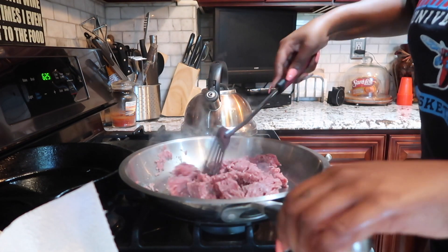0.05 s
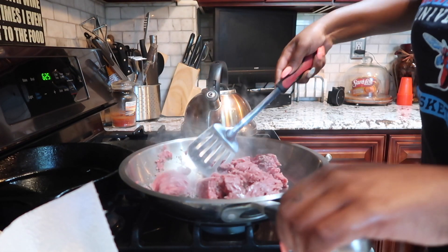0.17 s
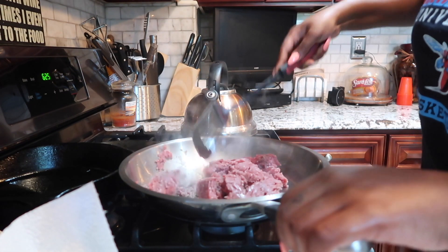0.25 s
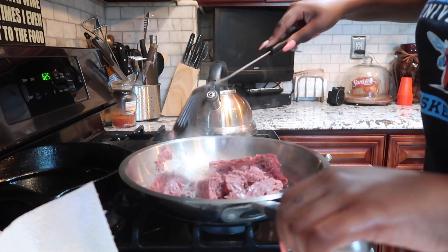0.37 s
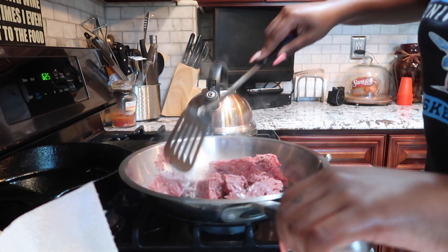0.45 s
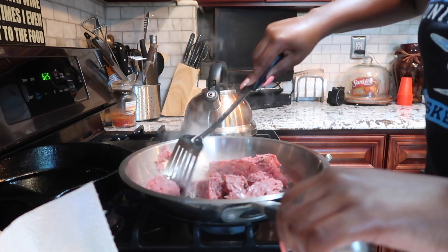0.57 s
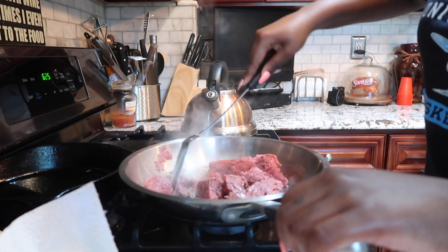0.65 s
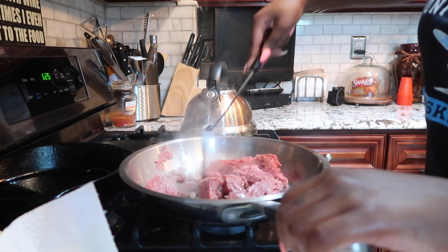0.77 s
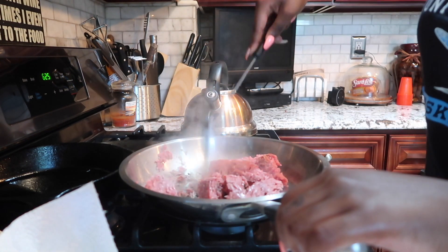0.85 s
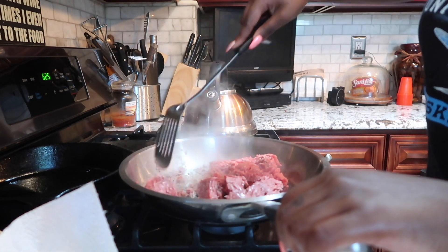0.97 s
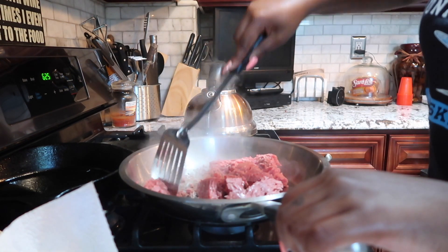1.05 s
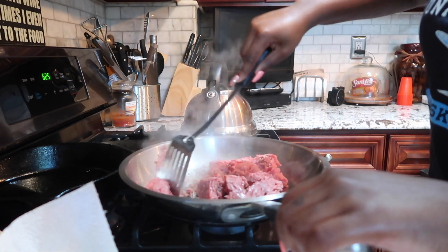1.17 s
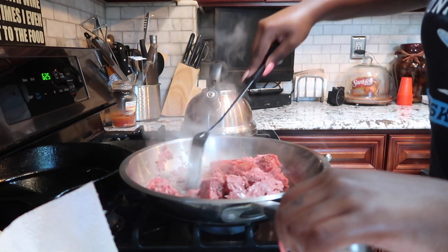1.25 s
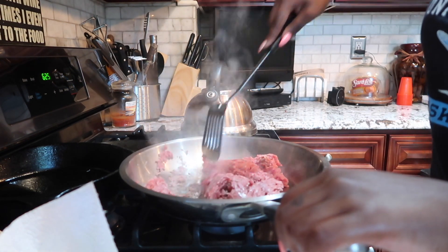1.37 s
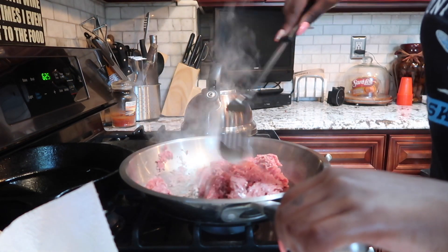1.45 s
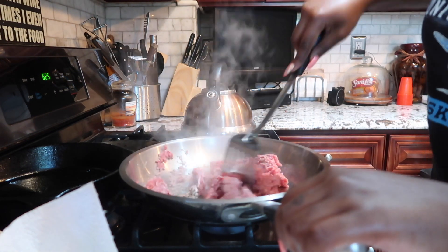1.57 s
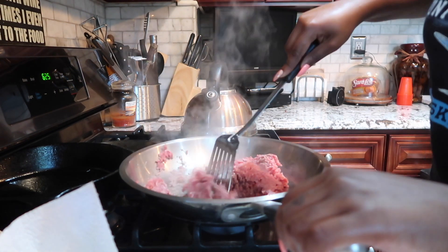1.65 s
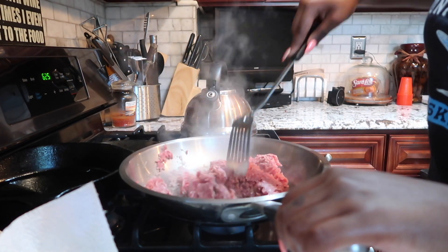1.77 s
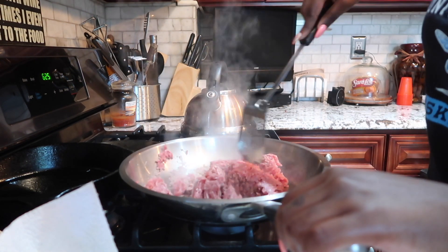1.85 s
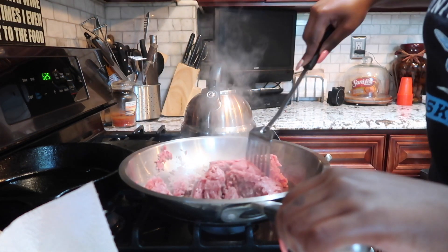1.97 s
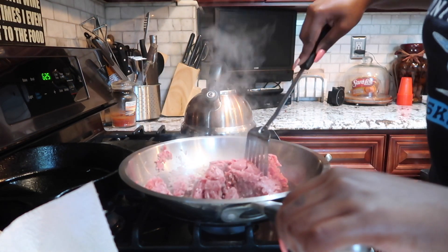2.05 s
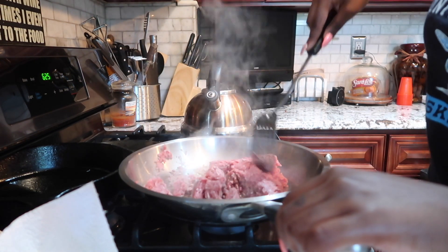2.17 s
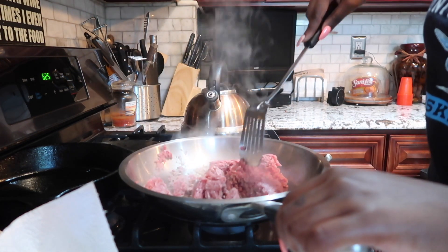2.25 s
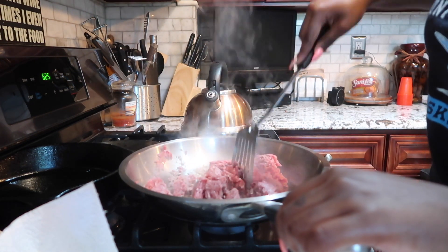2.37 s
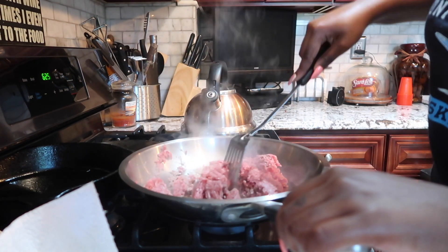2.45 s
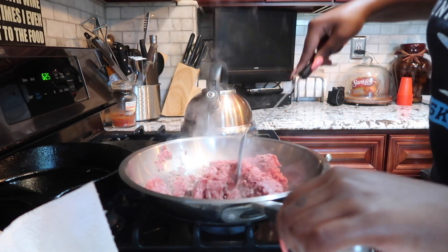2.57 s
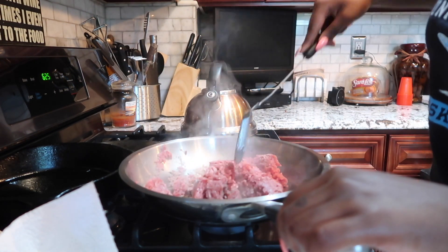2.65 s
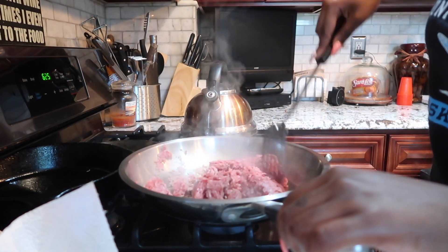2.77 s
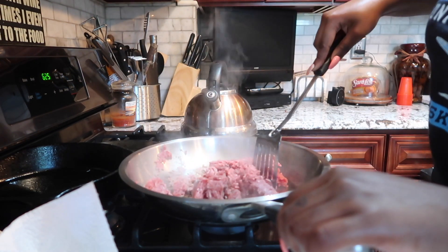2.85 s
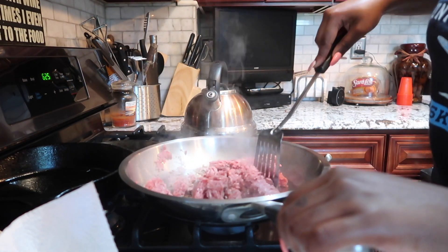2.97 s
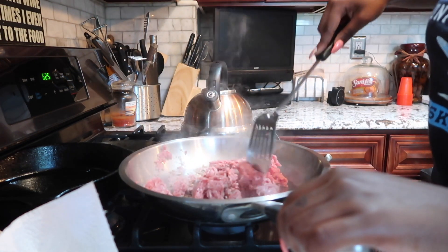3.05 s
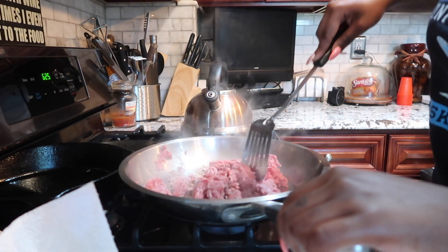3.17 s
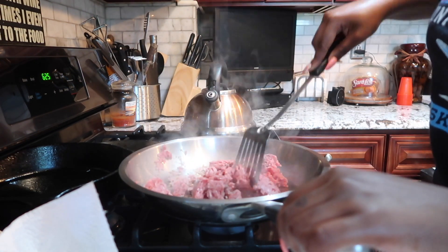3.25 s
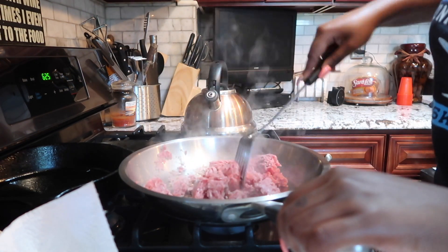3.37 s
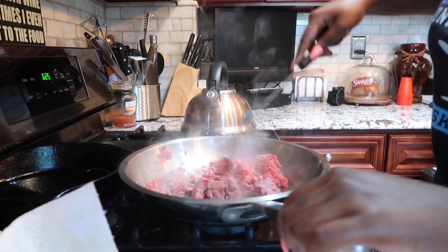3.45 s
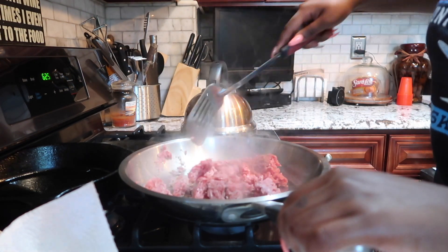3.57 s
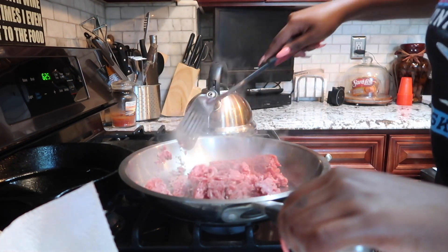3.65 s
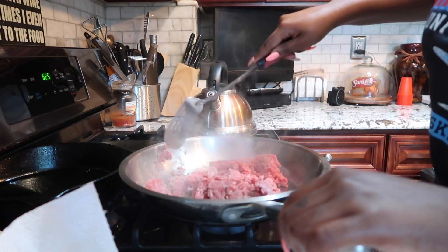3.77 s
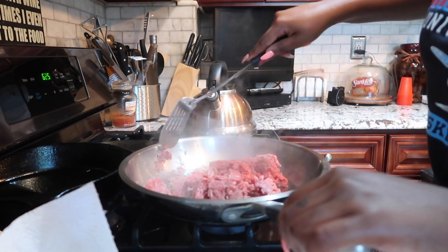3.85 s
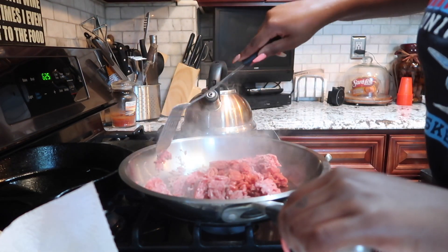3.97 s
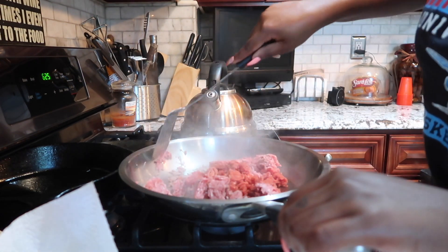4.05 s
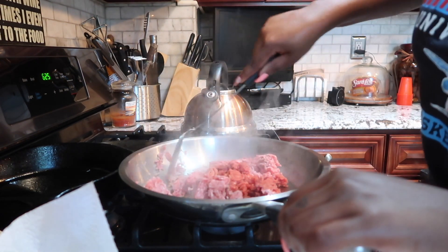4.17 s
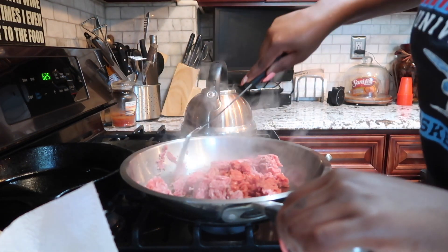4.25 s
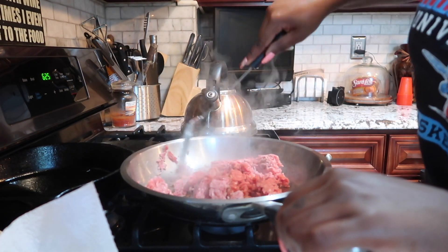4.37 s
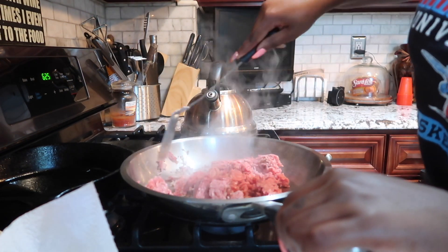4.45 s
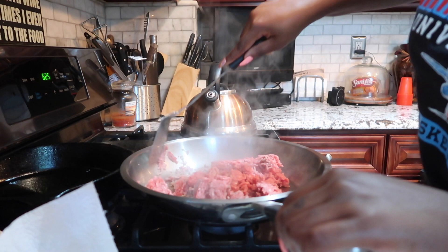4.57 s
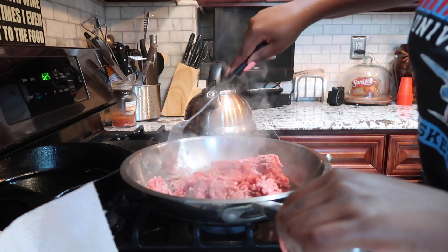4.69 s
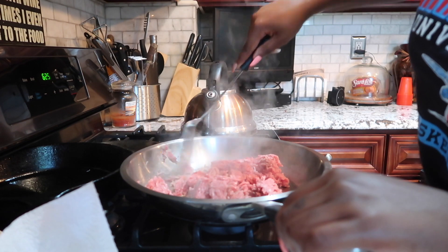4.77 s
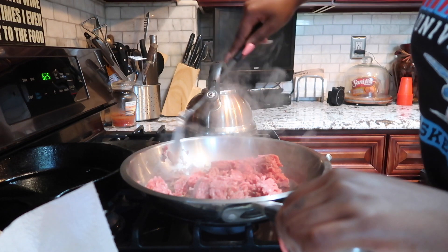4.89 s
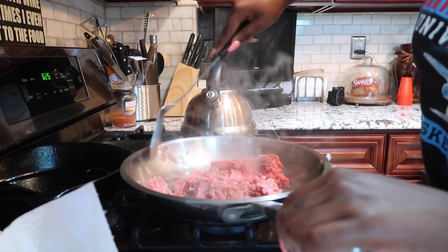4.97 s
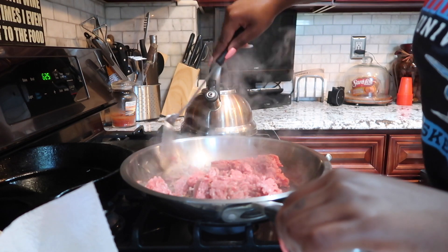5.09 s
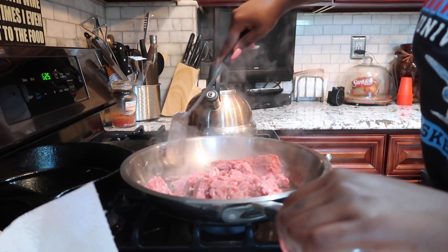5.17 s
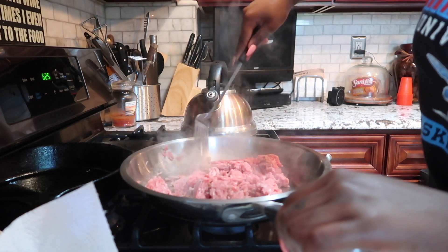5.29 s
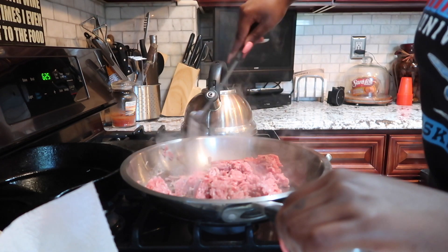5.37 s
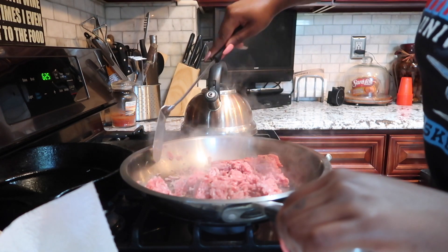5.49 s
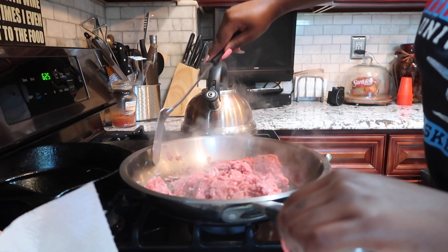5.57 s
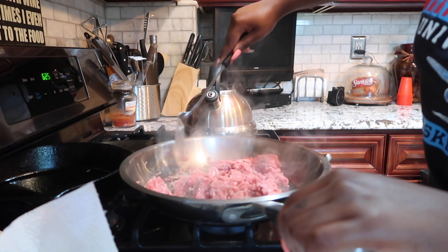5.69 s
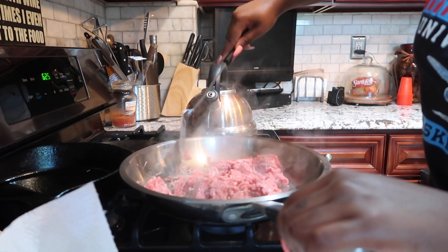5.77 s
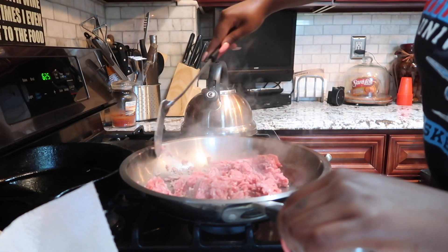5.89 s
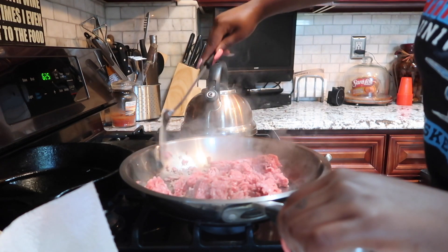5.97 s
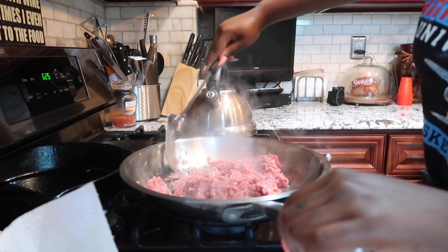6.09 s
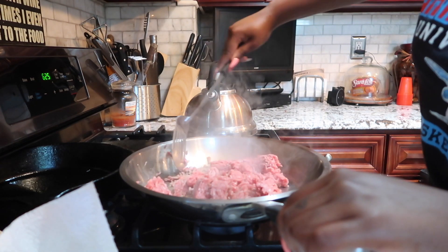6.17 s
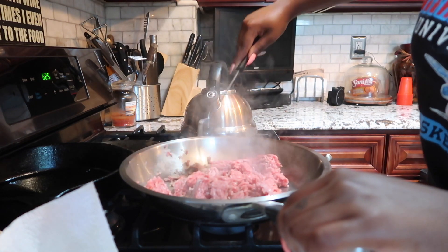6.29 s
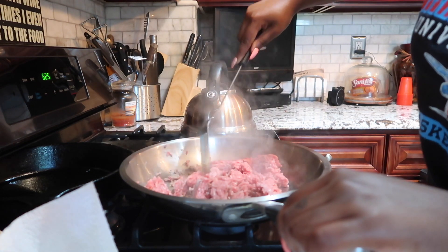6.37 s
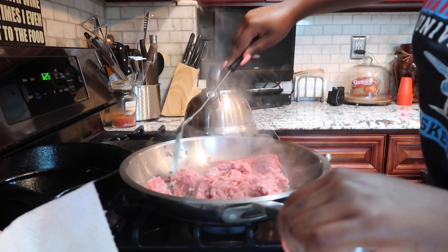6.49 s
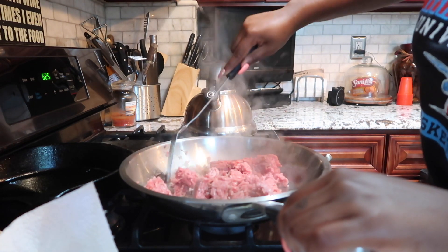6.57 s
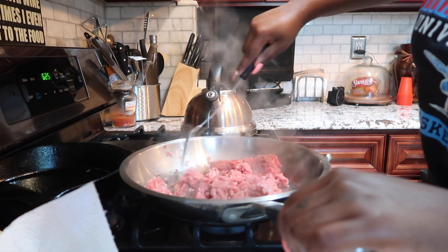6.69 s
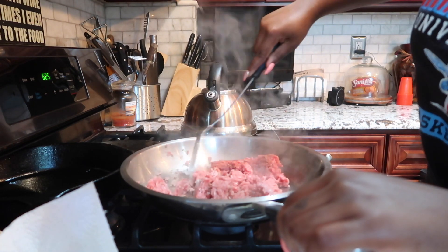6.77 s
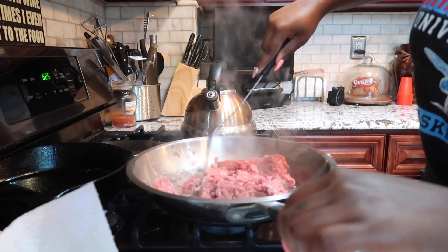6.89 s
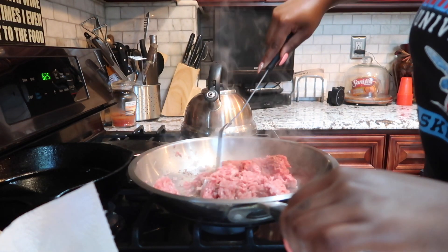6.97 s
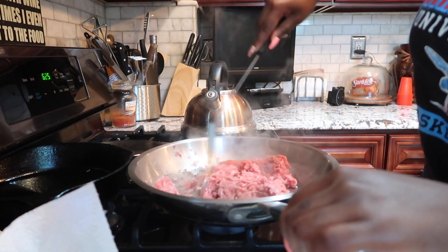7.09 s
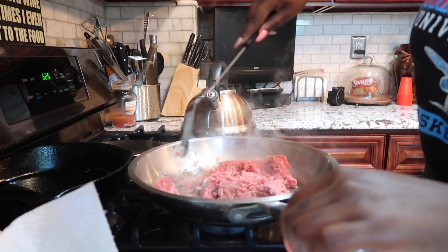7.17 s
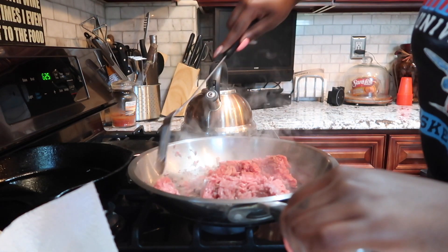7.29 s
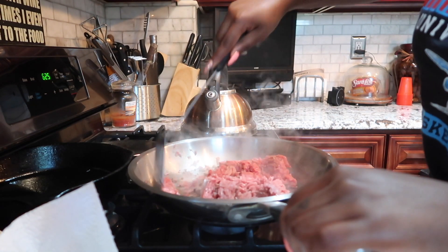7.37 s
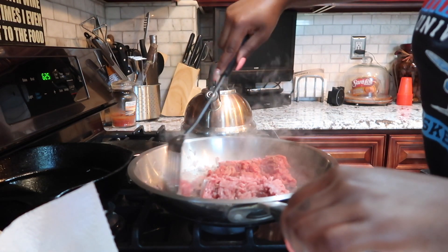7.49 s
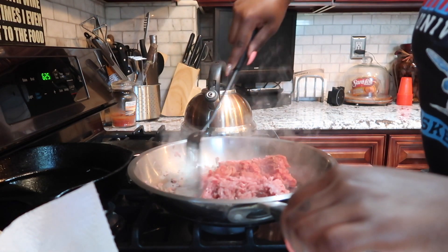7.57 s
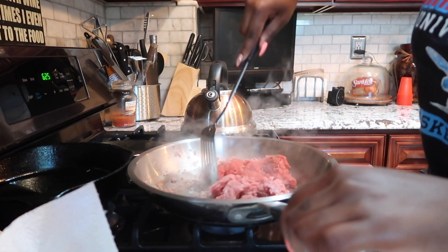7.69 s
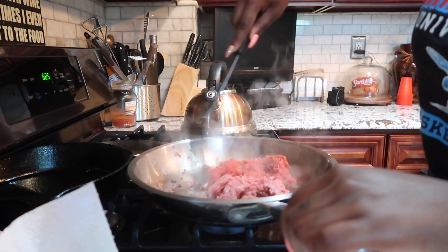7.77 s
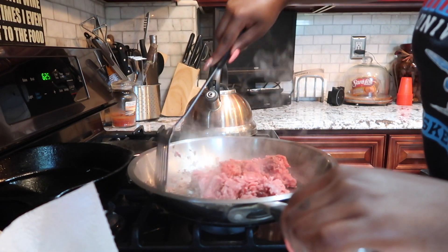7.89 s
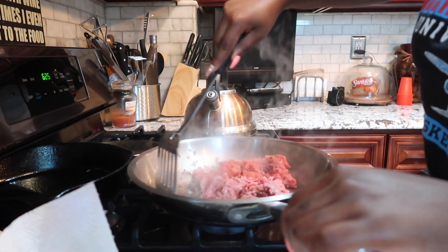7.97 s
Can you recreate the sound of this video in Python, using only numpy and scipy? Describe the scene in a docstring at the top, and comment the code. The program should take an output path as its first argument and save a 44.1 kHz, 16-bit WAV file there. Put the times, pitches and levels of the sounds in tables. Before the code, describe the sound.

Fat hisses and crackles continuously in a steel pan, heard from very near with a short room tail and faint rumble. Spatula blows begin soft, become bright and ringing, then thin out to lighter taps. Later come rough scrapes, a brief rising squeak, a hard clank and a longer scrape, while the frying surges; loud hits briefly duck the sound.

```python
"""Ground meat fries in a steel pan in a small kitchen, heard from close by through a pair of microphone ports.
The fat is random bubble bursts and noise, shaped in spectrum and flickering, over an uneven hum.
A metal spatula chops, scrapes and once squeaks on the pan floor: blows and scrapes ring the pan's modes,
the squeak is a rising sine. A short room tail and a faint rumble lie behind.
Loud blows make the recorder turn itself down and climb back slowly."""
import sys
import numpy as np
from scipy import signal
from scipy.fft import rfft, irfft, next_fast_len
from scipy.io import wavfile
from scipy.ndimage import uniform_filter1d, minimum_filter1d

SR = 44100
rng = np.random.default_rng(int(sys.argv[2]) if len(sys.argv) > 2 else 0)


def decibels_to_gain(level_db):
    """Convert a level in decibels to a linear amplitude gain (20 dB per decade)."""
    exponent = np.asarray(level_db, float) / 20
    return 10 ** exponent


def store_wav(level_fs):
    """Save 16-bit WAV to argv[1]."""
    pcm = np.round(np.clip(np.atleast_2d(level_fs), -1, 1) * 32767)
    wavfile.write(sys.argv[1], SR, pcm.T.astype(np.int16))


N = 353968

# swing of the sizzle's level before the gain control: t/s, level/dB
SIZZLE_SWING = [(0.0, -4.5), (0.2, -4), (0.75, 0.5), (1.1, 1.5), (1.3, -0.5), (1.5, -0.5), (1.65, 2),
                (1.85, 0), (2.8, -2.5), (3.3, -1), (4.2, -1), (5.0, -0.5), (5.3, -4.5), (5.6, -3),
                (6.0, -3), (6.5, 0), (6.75, 2.5), (6.95, 3), (7.3, 4.5), (7.6, 6), (7.8, 8), (8.03, 8.5)]
# spectrum of the frying fat: f/Hz, level per Hz/dB
SIZZLE_SPECTRUM = [(410, -57), (700, -13), (839, -24), (1060, -19), (1320, -9.5), (1670, -2.5), (2000, -2),
                   (2250, 3.5), (2590, 2), (3540, 2), (4130, -3), (8650, -15.5), (12400, -18.5),
                   (14500, -24), (15500, -17)]
# spectrum of the hum under the frying: f/Hz, level per Hz/dB
HUM_SPECTRUM = [(71, -42), (120, -4), (205, -3), (259, -0.5), (435, -9.5), (519, -3), (613, -7), (673, 0.5),
                (841, -10), (1020, 2), (1100, 0.5), (1430, -5), (2420, -120)]
# swing of the low hum, before HUM_FOLLOWS: t/s, level/dB
BASS = [(0.0, 1), (0.2, -8.5), (0.7, -0.5), (1.4, 1), (2.5, -7), (3.5, -3), (4.3, -1), (5.0, 1.5),
        (5.7, -6.5), (6.3, -3.5), (6.9, 9), (7.3, 8.5), (8.03, 14)]
# clear modes of the pan, t60 before the share used by blows or scrapes: f/Hz, level/dB, t60/s
PAN_MODES = [(210, -12, .12), (338, -1, .16), (463, -4, .15), (523, -2, .2), (664, -7, .3), (705, -5, .15),
             (870, -4, .11), (912, -10, .14), (1220, -7, .18), (1310, -6, .16), (1362, -5, .16),
             (1445, -4, .15), (1535, -3, .18), (1630, -5, .16), (1725, 0, .17), (1778, -2, .16),
             (1848, -4, .18), (1892, -5, .2), (1940, -1, .24), (2030, -3, .2), (2092, -5, .15),
             (2142, -6, .15), (2195, -6, .14), (2245, -8, .14), (2300, -2, .2), (2440, -5, .2),
             (2560, -6, .15), (2625, -6, .15), (2695, -4, .16), (2795, -3, .18), (2870, -3, .16),
             (2940, -3, .2), (3060, -4, .12), (3140, -6, .18), (3190, -4, .2), (3320, -2, .22),
             (3368, -1, .2), (3485, -1, .22), (3555, -5, .16), (3640, 0, .18), (3920, -4, .14),
             (4075, -6, .18), (4260, -6, .14), (4590, -9, .18), (4705, -7, .16), (5220, -5, .2),
             (5420, -7, .15), (5600, -9, .15), (5760, -10, .15), (6110, -9, .2), (6440, -9, .16),
             (6620, -11, .14), (6900, -12, .12), (7280, -14, .12), (7700, -14, .1)]
# spatula on the pan: t/s, thud level/dB, clank level/dB, ring level/dB, tick level/dB, contact/s,
# then each f/Hz that the spot struck favours, strongest first
BLOWS = [(0.002, -23.5, -23.5, -29, -47, 0.0032, 523, 690, 1362, 2200, 2440),
         (0.393, -55, -40, -26, -40, .005, 683, 2380, 2700, 3780),
         (0.566, -44, -32.5, -27, -44, 0.0042, 690, 2390, 3100, 3560),
         (0.646, -32, -51, -30, -48, 0.009, 335, 2090, 3330, 3910),
         (0.83, -29.5, -22.5, -17.5, -32, 0.013, 2790, 1778, 2190, 540, 3400, 2620, 4080),
         (0.846, -36, -38, -43, -64, 0.0057, 340, 662, 1850, 2930),
         (1.187, -25, -17, -15, -29, 0.0081, 3368, 2092, 540, 335, 2240, 912, 1725),
         (1.203, -30, -51, -44, -65, 0.004, 340, 664, 1885, 2435),
         (1.664, -14.5, -8, -3, -10, .0105, 870, 2630, 1750, 3480, 3150, 2940, 4700, 2142),
         (2.039, -16, -10, -5, -20, 0.007, 2940, 670, 2700, 1445, 3480, 870, 3600, 4705),
         (2.051, -27.5, -11, -9, -22, 0.018, 2880, 1910, 2940, 1225, 664),
         (2.499, -15.5, -9.5, -5.5, -16, 0.0055, 2940, 3640, 523, 1960, 1640, 664, 1362, 2440),
         (2.897, -17, -6.5, -2.5, -15, 0.0038, 670, 3380, 1440, 2320, 3160, 2020, 2790, 3500, 4600),
         (3.406, -23.5, -27, -28, -46, 0.0053, 515, 1360, 350),
         (4.109, -34.5, -19.5, -22, -38, 0.017, 1240, 2140, 3500, 1760, 1960),
         (4.254, -29, -19, -16, -30, 0.0081, 3640, 1715, 1362, 523, 3150),
         (4.656, -30, -15, -16, -30, 0.0058, 2310, 3650, 1765, 3150, 1305, 2785),
         (4.765, -35, -25, -44, -65, 0.0092, 1305, 2330, 3140, 5220),
         (5.088, -31.5, -15.5, -11.5, -24, 0.011, 1940, 2940, 2300, 3180, 3350, 1305, 3490),
         (5.599, -39, -47, -36, -56, 0.004, 210, 345, 2550, 3150),
         (5.76, -42, -53, -48, -70, .006, 523, 660, 2550, 3150),
         (6.12, -41.5, -37.5, -46, -68, .006, 523, 664, 2550, 3180),
         (6.318, -38, -20, -30, -47, 0.01, 1870, 3640, 1550, 662),
         (6.35, -40, -16.5, -23, -38, 0.019, 1778, 1940, 3650, 1550, 3550),
         (6.388, -46, -21, -20.5, -36, 0.027, 3365, 1940, 1365, 1765, 3650),
         (6.639, -16.5, -12.5, -12.5, -26, 0.0046, 3368, 1890, 338, 1770, 530, 2290, 660, 2140, 3650),
         (7.008, -10.5, -1.5, -9, -21, 0.0049, 1720, 3640, 335, 1850, 530, 1440, 1220),
         (7.489, -15.5, -5, -10, -20, 0.015, 1530, 2690, 1310, 1450, 2860, 1930),
         (7.65, -22, -16.5, -18, -33, 0.021, 490, 1740, 2430, 2870),
         (8.017, -18.5, -9.5, -16, -30, 0.007, 335, 1310, 2560, 2700)]
# centres of thud, clank, ring and tick: f/Hz
REGISTERS_HZ = [550, 1700, 3200, 7000]
# spectrum of the pan's many faint modes: f/Hz, level per Hz/dB
FAINT_MODES = [(88, -12), (150, -25), (566, -17), (1080, -15.5), (1380, -14), (3130, -3), (3440, 6),
               (3930, 2), (4660, 4), (5020, 1.5), (14000, -9)]
# edge dragged over the pan floor: start t/s, length/s, level/dB, then each favoured f/Hz
SCRAPES = [(0.02, 0.13, -29, 523, 685), (0.658, 0.059, -27, 2190, 3180), (0.743, 0.11, -25, 2300, 2880),
           (5.712, 0.1, -28, 665, 2300), (6.012, 0.053, -23, 1760, 2230), (6.068, 0.098, -29, 1800, 2900),
           (6.188, 0.098, -23, 1320, 2620), (6.33, 0.13, -16.5, 1370, 1778, 1940, 3365, 3660),
           (6.92, 0.1, -26, 523, 1220), (7.582, 0.17, -15, 1740, 2430)]
# rumble behind the cooking: t/s, level/dB
RUMBLE = [(0.0, -59), (0.47, -60), (0.71, -50), (0.93, -58), (1.51, -50), (1.87, -54), (2.85, -57),
          (3.3, -62), (3.83, -50), (4.12, -52), (4.43, -50.5), (5.1, -55), (5.7, -58), (6.55, -48),
          (6.97, -42), (7.15, -48), (8.0, -44)]
# how far one port leads the other: f/Hz, level of difference against sum/dB
PORT_LEAD = [(60, -23), (200, -22.5), (700, -23.5), (1300, -20), (2380, -19), (4400, -12), (8120, -5),
             (15000, -13)]
# unrelated part of the two ports: f/Hz, level of difference against sum/dB
PORT_UNRELATED = [(60, -29), (110, -41), (200, -32), (380, -25), (700, -28.5), (1290, -25), (2380, -33.5),
                  (4400, -8), (8120, 1), (12000, 2), (15000, 2)]

SIZZLE_DB, SPIT_DB, HUM_DB = -23.5, -20, -37.5   # before the swings of sizzle and bass
SPIT_FOLLOWS, HUM_FOLLOWS = 1.03, 0.69   # share of the swing of sizzle and of bass
DRONE_HZ, DRONE_T60_S, DRONE_DB = 266, 1, -22   # a faint low drone, level against the hum
RING_SHARE = 1.07   # share of the modes' t60 after a blow
# each mode has a twin about this share of its pitch above, so that it beats
TWIN_SHARE, TWIN_DB = 0.012, -4.5
# favoured modes start louder, lose their lead in this time; share lost per place in the row
FAVOUR_DB, FAVOUR_S, FAVOUR_FALL = 16, 0.12, 0.07
FAINT_T60_S = 0.52   # faint modes under the meat
FAINT_DB, FAINT_FOLLOWS = -3, 0.2   # against the clear modes; harder blows wake more of them
CRACK, CRACK_FOLLOWS = 1.09, 0.11   # harder blows crack more sharply
BITE_S, EASE_DB = 0.019, -14.5   # a drag bites, then eases off by its end
DRAG_FAVOUR_DB = 9.5
SQUEAK_S, SQUEAK_LENGTH_S, SQUEAK_DB = 6.718, 0.042, -17
SQUEAK_HZ, SQUEAK_RISE_HZ_PER_S = 2750, 3300
KITCHEN_T60_S, KITCHEN_CUT_HZ = 0.51, 4200
KITCHEN_DB = [[-8.5], [-0.5]]   # in the first and second rendering
# gain control of the recorder
LOUD_DB, LISTEN_S, TURN_DOWN_S, HOLD_S, CLIMB_DB_PER_S = -16, 0.018, 0.045, 0.089, 8


def frying():
    """Steam bubbles burst in the fat by the thousand, in two unrelated sets, over a humming pan."""
    swing_db, = in_time(SIZZLE_SWING)
    bass_db, = in_time(BASS)
    sizzle_db = SIZZLE_DB + swing_db
    spit_db = SPIT_DB + SPIT_FOLLOWS * swing_db
    hum_db = HUM_DB + HUM_FOLLOWS * bass_db

    bubbles = rms_one(grains(9000, spread_db=2, shape=(2, N)))
    bursts = bubbles + rng.standard_normal((2, N))
    bands = split(coloured(bursts, SIZZLE_SPECTRUM), np.geomspace(900, 12000, 7))
    # each band flickers on its own
    parts = [part * decibels_to_gain(1.36 * drift(9.1)) for part in bands]
    scale = np.std(sum(parts[:5]))
    sizzle = sum(parts[:4]) / scale
    spit = sum(parts[4:]) / scale
    fat = decibels_to_gain(0.66 * drift(25)) * (decibels_to_gain(sizzle_db) * sizzle + decibels_to_gain(spit_db) * spit)

    wash = rng.standard_normal((2, N))
    hum = rms_one(coloured(wash, HUM_SPECTRUM)) * decibels_to_gain(2 * drift(8))
    # the frying keeps one low pan mode humming unevenly
    hum += decibels_to_gain(-14 + 4 * drift(4)) * rms_one(ring(wash, PAN_MODES[4][0], 0.16))
    hum += decibels_to_gain(DRONE_DB + 6.4 * drift(2.5)) * rms_one(ring(wash, DRONE_HZ, DRONE_T60_S))
    return fat + decibels_to_gain(hum_db) * hum


def blows():
    """Each blow cracks, chatters and rings the clear modes over a dense noisy mass of damped faint ones."""
    hz, mode_db, t60 = np.transpose(PAN_MODES)[:, :, None]
    t = np.arange(SR // 3) / SR
    decay = decibels_to_gain(-60 * t / (t60 * RING_SHARE))
    twin_hz = hz * (1 + TWIN_SHARE * rng.uniform(0.73, 1.4, hz.shape))
    main = decay * np.sin(2 * np.pi * hz * t)
    twins = decibels_to_gain(TWIN_DB) * decay * np.sin(2 * np.pi * twin_hz * t)
    modes = np.vstack([main, twins])
    hz, mode_db = np.tile(hz[:, 0], 2), np.tile(mode_db[:, 0], 2)
    masses = split(coloured(rng.standard_normal(N), FAINT_MODES), REGISTERS_HZ)
    # how much of each mode belongs to each register
    shares = np.array([np.interp(np.log(hz), np.log(REGISTERS_HZ), one)
                       for one in np.eye(len(REGISTERS_HZ))])
    out = np.zeros(N + SR)
    for s, thud_db, clank_db, ring_db, tick_db, contact_s, *favoured_hz in BLOWS:
        at = round(s * SR)
        # the spot struck favours the modes nearest these pitches
        place = 1 - FAVOUR_FALL * np.arange(len(favoured_hz))
        near = (place * np.exp(-(np.log(hz[:, None] / favoured_hz) / 0.018) ** 2)).max(1)
        level = shares * decibels_to_gain(mode_db + rng.normal(0, 1.5, hz.shape)) * rng.choice([-1, 1], hz.shape)
        extra = level * (decibels_to_gain(FAVOUR_DB * near) - 1)
        rung = level @ modes + extra @ modes * np.exp(-t / FAVOUR_S)
        # the blade chatters on the steel for the time of contact
        contact = np.exp(-(t / contact_s) ** 3)
        touch = grains(900, spread_db=2.5, shape=len(t)) * contact * 0.07
        touch[0] = 1
        levels_db = thud_db, clank_db, ring_db, tick_db
        for free, mass, db, centre_hz in zip(rung, masses, levels_db, REGISTERS_HZ):
            clear = signal.fftconvolve(free, touch[:SR // 20])[:len(t)]
            faint = np.roll(mass, -at)[:len(t)] * decibels_to_gain(-60 * t / FAINT_T60_S)
            faint_gain = decibels_to_gain(FAINT_DB + FAINT_FOLLOWS * ring_db)
            # low registers take longer to build
            rise = 1 - np.exp(-t * centre_hz / 0.41)
            crack = CRACK * decibels_to_gain(CRACK_FOLLOWS * ring_db) * np.sqrt(min(centre_hz, 3500) / 700)
            part = rise * (1 + crack * contact) * (rms_one(clear) + faint_gain * rms_one(faint))
            # the level is that of the first 20 ms
            out[at:at + len(t)] += decibels_to_gain(db) * part / np.std(part[:SR // 50])
    return band(out[:N], 150, 11000)


def scrapes():
    """The edge sticks and slips thousands of times a second and so drives the lower pan modes."""
    t = np.arange(N) / SR
    hz, mode_db, t60 = np.transpose(PAN_MODES)
    slips = grains(2500, spread_db=2.0, shape=N)
    # the modes ring shorter than after a blow
    rung = band(np.array([ring(slips, f, 0.72 * d) for f, d in zip(hz, t60)]), 450, 3900)
    out = np.zeros(N)
    for s, length, db, *favoured_hz in SCRAPES:
        near = np.exp(-(np.log(hz[:, None] / favoured_hz) / 0.025) ** 2).max(1)
        ease_db = EASE_DB * np.clip((t - s) / length, 0, 1)
        bite = np.clip((t - s) / BITE_S, 0, 1)
        drag = decibels_to_gain(db + ease_db) * bite * (t < s + length)
        scraped = rms_one(decibels_to_gain(mode_db + DRAG_FAVOUR_DB * near) @ rung)
        out += uniform_filter1d(drag, size=300) * scraped
    return out


def squeak():
    """The edge slips evenly for a moment and sings a short rising note."""
    t = np.clip(np.arange(N) / SR - SQUEAK_S, 0, SQUEAK_LENGTH_S)
    swell = np.sin(np.pi * t / SQUEAK_LENGTH_S)
    cycles = t * (SQUEAK_HZ + SQUEAK_RISE_HZ_PER_S * t / 2)
    return decibels_to_gain(SQUEAK_DB) * swell * np.sin(2 * np.pi * cycles)


def kitchen(x):
    """The small room answers: eight feedback delays a rendering, duller on every round."""
    size = next_fast_len(N + SR)
    one_sample = np.exp(-2j * np.pi * np.fft.rfftfreq(size))
    dull = np.exp(-2 * np.pi * KITCHEN_CUT_HZ / SR)
    wall = (1 - dull) / (1 - dull * one_sample)
    out = np.zeros((2, len(one_sample)), complex)
    for k, lag in enumerate(np.geomspace(0.007, 0.033, 16) * SR):
        loop = decibels_to_gain(-60 * lag / SR / KITCHEN_T60_S) * wall * one_sample ** int(lag)
        out[k % 2] += (-1) ** (k // 2) * loop / (1 - loop)
    return irfft(out * rfft(x, size), size)[:, :N] / np.sqrt(8)


def rumble():
    """A faint low rumble, band-passed noise, swells and fades."""
    level_db = in_time(RUMBLE)[0] + 2.5 * drift(4.8)
    return decibels_to_gain(level_db) * rms_one(band(rng.standard_normal((2, N)), 23, 80))


def rms_one(x):
    """Scale to unit rms."""
    return x / np.sqrt(np.mean(x ** 2) + 1e-20)


def in_time(rows):
    """Columns of a curve table, one value a sample."""
    s, *columns = np.transpose(rows)
    return [np.interp(np.arange(N) / SR, s, c) for c in columns]


def log_grid(size):
    """Natural log of the frequency in Hz of every bin."""
    return np.log(np.maximum(np.fft.rfftfreq(size, 1 / SR), 1))


def coloured(x, points, turn=1):
    """Filter x by a curve of f/Hz, level/dB; turn rotates the phase."""
    size = next_fast_len(N)
    hz, db = np.transpose(points)
    gain = decibels_to_gain(np.interp(log_grid(size), np.log(hz), db))
    return irfft(rfft(x, size) * turn * gain, size)[..., :N]


def split(x, centres_hz):
    """Overlapping bands that add up to x again."""
    size = next_fast_len(N)
    grid, whole = log_grid(size), rfft(x, size)
    return [irfft(whole * np.interp(grid, np.log(centres_hz), one), size)[..., :N]
            for one in np.eye(len(centres_hz))]


def band(x, low_hz, high_hz):
    """Butterworth band-pass."""
    return signal.sosfilt(signal.butter(2, [low_hz, high_hz], "band", fs=SR, output="sos"), x)


def drift(rate_hz):
    """Slow chance with spread 1: noise through two equal poles, drawn every 40 samples."""
    r = np.exp(-2 * np.pi * rate_hz * 40 / SR)
    noise = rng.standard_normal(N // 40 + 2002)
    slow = signal.lfilter([1], [1, -2 * r, r * r], noise)[2000:]   # settled part only
    return np.interp(np.arange(N) / 40, np.arange(len(slow)), rms_one(slow))


def ring(clicks, hz, t60):
    """A two-pole resonator: a unit click sets a decaying sine of height 1 ringing."""
    r, w = decibels_to_gain(-60 / (t60 * SR)), 2 * np.pi * hz / SR
    return signal.lfilter([0, np.sin(w)], [1, -2 * r * np.cos(w), r * r], clicks + 1e-18)


def grains(per_s, spread_db, shape):
    """Random clicks of either sign, a few of them much stronger than the rest."""
    sizes = decibels_to_gain(spread_db * np.minimum(rng.exponential(1, shape), 5)) * rng.choice([-1, 1], shape)
    return sizes * (rng.random(shape) < per_s / SR)


def scene():
    """Two unrelated renderings of fat, rumble and room; the spatula sounds directly in the first."""
    steel = blows() + scrapes() + squeak()
    room = decibels_to_gain(np.array(KITCHEN_DB)) * kitchen(steel)
    return frying() + steel * [[1], [0]] + room + rumble()


def gain_control(x):
    """Whatever is louder than the limit turns the gain down; it holds, then climbs back at a steady pace."""
    listen, hold = int(LISTEN_S * SR), int(HOLD_S * SR)
    # both windows look back only
    power = uniform_filter1d(x ** 2, size=listen, origin=(listen - 1) // 2, mode="constant")
    over_db = np.maximum(10 * np.log10(np.abs(power) + 1e-12) - LOUD_DB, 0)
    held_db = -minimum_filter1d(-over_db, size=hold, origin=(hold - 1) // 2, mode="constant")
    climb_db = CLIMB_DB_PER_S * np.arange(N) / SR
    down_db = np.maximum.accumulate(held_db + climb_db) - climb_db
    r = np.exp(-1 / (TURN_DOWN_S * SR))
    return decibels_to_gain(-signal.lfilter([1 - r], [1, -r], down_db))


def roll_off(x):
    """The treble ends steeply here."""
    return signal.sosfilt(signal.butter(12, 15690, fs=SR, output="sos"), x)


def record(dry):
    """Close ports agree in the bass and part in the treble, where one leads; loud blows turn the gain down."""
    # a quarter turn of phase puts one port ahead of the other
    side = coloured(dry[0], PORT_LEAD, turn=1j) + coloured(dry[1], PORT_UNRELATED)
    ports = np.array([dry[0] + side, dry[0] - side]) * gain_control(dry[0])
    mix = np.clip(ports, -1, 1)   # peaks above full scale overload
    return roll_off(mix)


dry = scene()
out = record(dry)
store_wav(out)
```